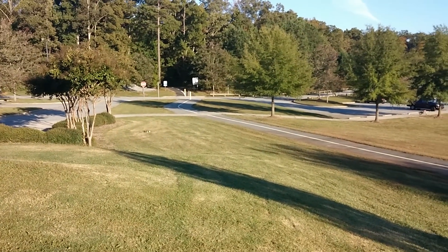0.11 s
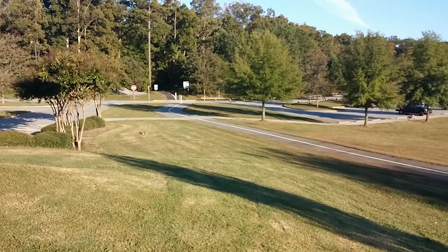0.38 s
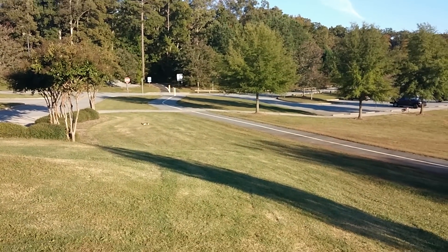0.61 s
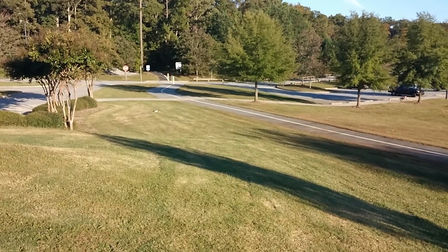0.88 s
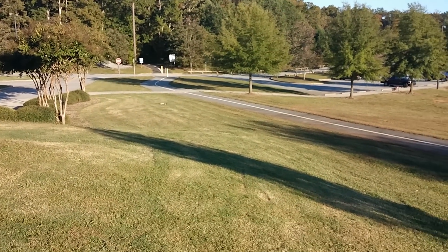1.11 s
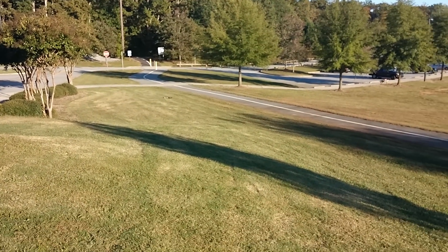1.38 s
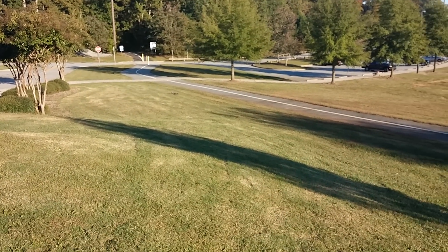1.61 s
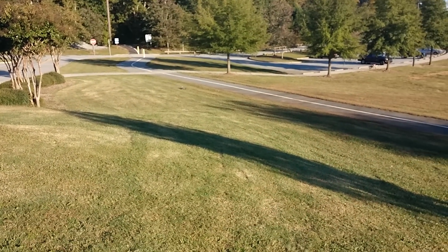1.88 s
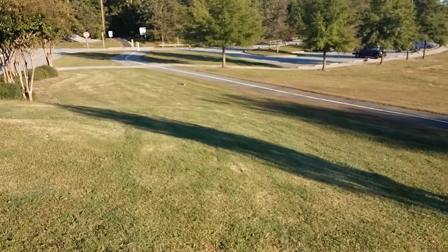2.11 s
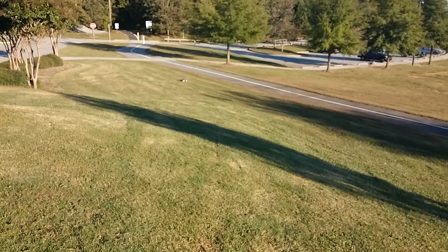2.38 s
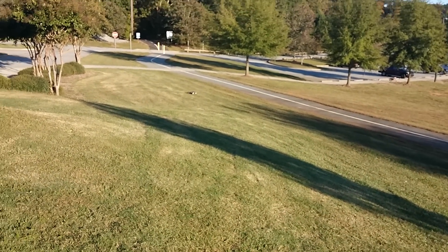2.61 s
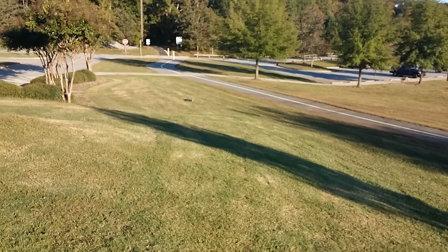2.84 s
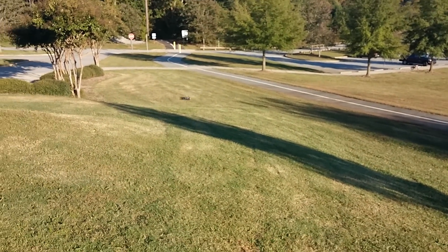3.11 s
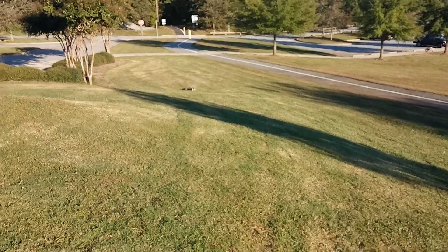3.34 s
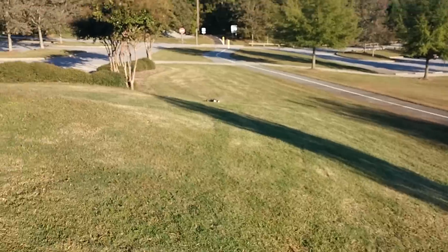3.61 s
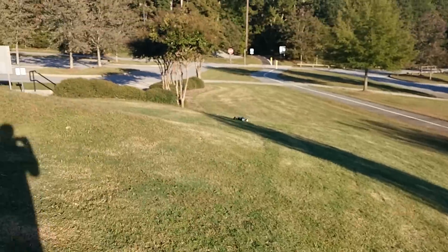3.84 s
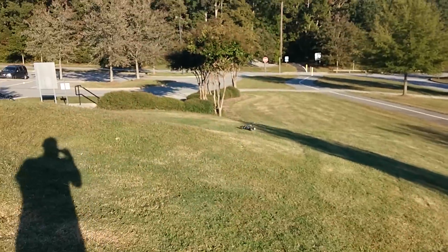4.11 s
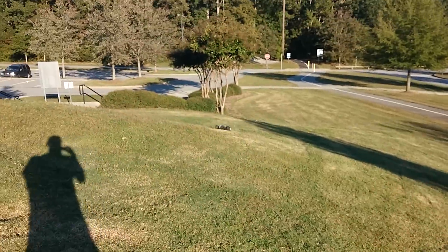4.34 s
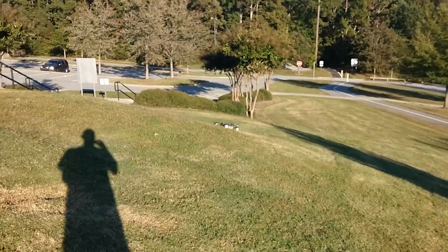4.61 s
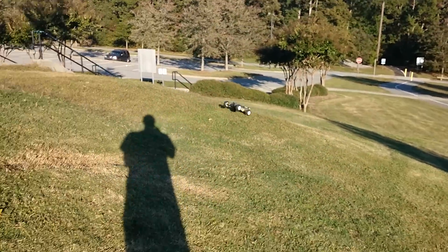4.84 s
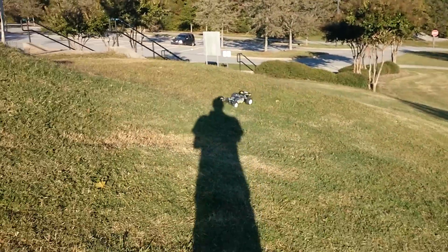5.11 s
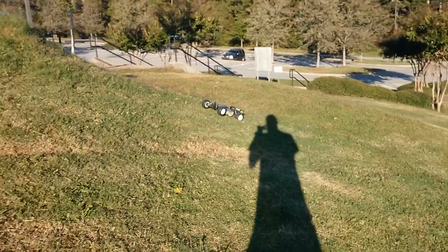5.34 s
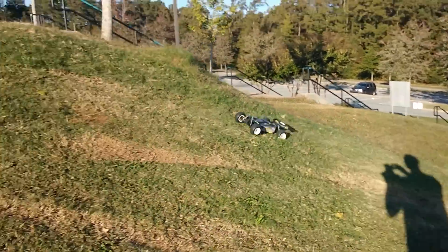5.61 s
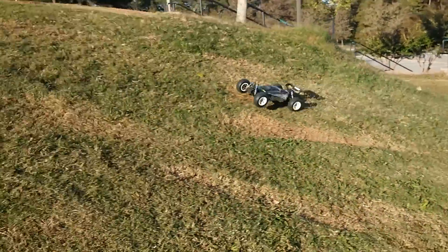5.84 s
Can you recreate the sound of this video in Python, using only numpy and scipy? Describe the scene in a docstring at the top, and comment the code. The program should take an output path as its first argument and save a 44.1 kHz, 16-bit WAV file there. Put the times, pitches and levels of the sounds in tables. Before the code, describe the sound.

A distant toy truck's thin gear whine grows into a harsh, buzzing rattle nearby, with handling thumps and sharp remote-trigger clicks over low traffic rumble.

```python
"""Electric model truck on park grass

The truck races over the grass and comes near: noise through gearbox resonances rattles, rough tones whine
and the speed controller sings high. Far traffic rumbles and washes as shaped noise. At the phone, fingers tap
beside its left microphone as short knocks; the remote's trigger clicks as noise bursts and its spring rings.
Now and then the level of park and truck dips briefly, while taps and clicks stay as they are."""
import sys
import numpy as np
from scipy import signal
from scipy.fft import rfft, irfft, next_fast_len
from scipy.io import wavfile
from scipy.ndimage import uniform_filter1d, map_coordinates

SR = 44100
rng = np.random.default_rng(int(sys.argv[2]) if len(sys.argv) > 2 else 0)


def bounce(signal):
    """Save signal as a 16-bit WAV file at the path given by the first command-line argument."""
    frames = np.transpose(np.atleast_2d(signal))
    limited = np.clip(frames, -1, 1)
    pcm = np.round(limited * 32767).astype(np.int16)
    wavfile.write(sys.argv[1], SR, pcm)


def invert_db(level):
    """Linear amplitude ratio for a level in decibels (20 dB per decade), elementwise."""
    return 10 ** (np.asarray(level, dtype=float) / 20)


N = 263277

# Brief dips of park and truck: t/s, depth/dB, half length/s
DIP_TIMES = [(0, 20, 0.044), (0.086, 21, 0.031), (0.368, 17, 0.081), (0.576, 10.5, 0.058),
             (1.251, 13.5, 0.031), (1.354, 11, 0.094), (1.707, 17.5, 0.014), (1.752, 4, 0.074),
             (2.053, 5, 0.065), (3.403, 6.5, 0.055), (3.633, 7, 0.062), (5.208, 7, 0.066)]
# Park ambience: t/s, rumble level/dB before heaves, relative level/dB of the traffic and grass wash
PARK_LEVELS = [(0, -52, -52), (.5, -40, -36.5), (1.1, -41.5, -45), (1.5, -48.5, -43.5), (1.9, -43.5, -47),
               (2.4, -43, -36.5), (2.75, -48, -49.5), (3.2, -43.5, -43), (3.8, -47, -41.5),
               (4.2, -45.5, -43.5), (4.85, -46.5, -42.5), (5.15, -42, -35.5), (5.55, -49.5, -47.5),
               (5.8, -40.5, -29), (5.97, -38, -54)]
# Heaves of the rumble: t/s, rise/dB
RUMBLE_HEAVES = [(.14, 10.5), (.29, 10.5), (.6, 10.5), (1.63, 7.5), (1.84, 13.5), (2.2, 7), (2.67, 6.5),
                 (2.87, 7), (3.28, 4.5), (3.52, 5.5), (3.75, 9.5), (4.1, 11), (4.42, 10), (5.08, 4.5),
                 (5.38, 12.5), (5.68, 4)]
# Colour of the rumble: f/Hz, relative level/dB per Hz
RUMBLE_COLOUR = [(18, -47), (30, -65), (52, -4.5), (102, 1), (145, -11.5), (185, -11.5), (220, -46),
                 (290, -65), (480, -120)]
# Colour of the wash: f/Hz, relative level/dB per Hz
WASH_COLOUR = [(88, -20), (150, -6), (220, -6.5), (281, -10), (301, -14.5), (937, -16), (1640, -37),
               (2200, -33), (2860, -95), (4840, -120)]
# Far sound at the two microphones: (f/Hz, left over right level/dB), (f/Hz, likeness, held within -1 to 1)
FAR_PORTS = ([(60, 3), (150, 2), (380, 5.5), (950, 4.5), (2380, -5.5), (5980, 33), (15000, -13)],
              [(60, 0.95), (150, 0.95), (380, 0.52), (950, -0.6), (2380, -1.7), (5980, 0.46), (15000, -1.1)])
# Near sound at the two microphones: (f/Hz, left over right level/dB), (f/Hz, likeness)
NEAR_PORTS = ([(60, 2.5), (130, 2.6), (290, 4), (640, 5.4), (1410, 8.7), (3100, 15.6), (6820, 8.4),
               (15000, 0.44)], [(60, 0.9), (500, 0.96), (1300, 0.52), (3000, 1), (5000, 0.06),
               (12000, 0.86)])
# The phone's body delays the left port: f/Hz, phase lag/rad
LEFT_LAG = [(1000, 0), (3500, 0), (4900, 4), (9500, 4), (12300, 4.5)]
# Truck: t/s, relative gear rattle level/dB, relative chassis level/dB
TRUCK_LEVELS = [(0, -58, -60.5), (.23, -52.5, -59.5), (.46, -54, -54.5), (.75, -47.5, -57.5),
                (1.03, -51.5, -55), (1.2, -57.5, -57), (1.65, -57.5, -57.5), (1.96, -48.5, -58),
                (2.15, -60.5, -56.5), (2.27, -57.5, -59), (2.38, -47, -58), (2.46, -42, -46.5),
                (2.62, -43, -53), (2.97, -37.5, -51.5), (3.08, -38, -52), (3.22, -37.5, -58),
                (3.5, -44, -52), (3.75, -40, -51), (4.11, -36, -57.5), (4.34, -39.5, -50.5),
                (4.46, -45, -45.5), (4.57, -34, -56.5), (4.75, -34, -38), (4.88, -28, -49),
                (5.04, -25, -41), (5.3, -29.5, -37.5), (5.46, -23, -41.5), (5.7, -20, -33),
                (5.97, -18.5, -31)]
# Place of the truck: t/s, 0 ahead to 1 on the left, 0 far to 1 near
TRUCK_PLACE = [(0, 0.49, 0.4), (2.2, 0.48, 0.036), (2.7, 0.77, 0.26), (3.8, 0.82, 0.17), (4.8, 0.97, 0.82),
               (5.97, 0.85, 1)]
# Gearbox shell resonances: f/Hz, width/Hz, relative strength/dB (halved in use)
SHELL_MODES = [(2980, 310, 8), (4465, 450, 14.5), (5710, 1140, 13), (8000, 1100, 0)]
# Colour of the rattle close by: f/Hz, relative level/dB per Hz
NEAR_RATTLE = [(1100, -51), (1800, -4.5), (2500, -11.5), (2900, -7.5), (3150, -1), (3420, 2), (3800, -2.5),
               (6150, -10.5), (7360, -16), (10900, -17), (14500, -18), (15700, -19.5)]
# Colour of the same rattle across the lawn: f/Hz, relative level/dB per Hz
FAR_RATTLE = [(1100, -49), (1800, -70), (2600, -13), (3070, -6), (3700, -9.5), (4400, -4.5), (5200, -6.5),
              (6040, -4.5), (7400, -9), (11000, -14.5), (15600, -18.5)]
# Colour of the chassis: f/Hz, relative level/dB per Hz
CHASSIS_COLOUR = [(76, -24), (130, -3.5), (150, -15.5), (238, 3.5), (368, -11.5), (520, -1), (916, -3.5),
                  (1330, -7), (1590, -7.5), (2800, -17.5), (3640, -61), (6160, -120)]
# Wheels hit bumps: t/s, relative chassis jolt level/dB
WHEEL_JOLTS = [(5.041, -41), (5.261, -39), (5.668, -26.5), (5.88, -44)]
# Motor: t/s, field turns per second, closing speed/(m/s)
MOTOR_COURSE = [(0, 70, -8), (.6, 70, -8), (1, 90, -4), (2.3, 200, 3), (4.1, 220, 3.5), (4.6, 230, 2.5),
                (5.3, 120, 0), (5.44, 100, 4), (5.55, 230, .5), (5.97, 220, -.5)]
# Speed controller: t/s, relative level/dB on top of the rattle level
CONTROLLER_LEVEL = [(0, -12), (.22, -6), (.5, -16), (2.2, -34), (2.4, -15.5), (4.1, -18), (4.7, -11.5),
                    (5.2, -22.5), (5.5, -15), (5.88, -13), (5.97, -7.5)]
# Finger taps: t/s, knock level/dB at left, knock f/Hz, cycles rung, tick level/dB against the knock
FINGER_TAPS = [(0.029, -36.5, 486, 4.7, -5), (0.1157, -10.5, 740, 0.31, -14),
               (0.1924, -22.5, 694, 0.94, -26), (0.2124, -30.5, 656, 2.4, -4), (.279, -19, 790, 0.77, -35),
               (0.399, -35, 458, 3, -31), (0.4541, -15, 736, 0.65, -13.5), (0.742, -29, 510, 0.66, -3),
               (0.804, -3, 750, 0.41, -12.5), (0.8844, 0.5, 890, 0.44, -1), (0.9234, 2, 910, 0.31, -5.5),
               (1.2045, -30.5, 376, 1.6, -16), (2.178, -21, 343, 1.9, -11.5), (2.2197, -26, 850, 2.3, -33),
               (2.3213, -29, 378, 0.81, -6), (2.3445, -25, 301, 0.92, -6), (2.376, -23.5, 473, 2.6, -13),
               (2.425, -23, 330, .8, -14), (2.4581, -13.5, 426, 2.5, -2), (2.9595, -27, 900, 3.6, 6),
               (3.5033, -21.5, 447, 3.5, -3), (3.5263, -21, 503, 2.4, -21), (3.6584, -25, 396, 0.23, -20),
               (3.719, -12, 655, 0.73, -8.5), (4.3568, -24.5, 920, 0.97, -11), (4.4202, -18, 540, 4.4, -8),
               (5.1053, -12, 503, 4, 2), (5.2683, -8.5, 770, 0.84, -10), (5.2708, -7, 600, 2.5, -13)]
# Pinion mesh in throttle bursts: t/s, f/Hz, relative level/dB, relative octave level/dB
PINION_MESH = [
    [(.39, 1650, -76, -70), (.47, 1990, -61, -51)],
    [(.64, 1690, -57, -56), (.675, 1830, -53, -58), (.7, 2080, -52, -52), (.72, 2450, -56, -70),
     (.76, 2580, -47, -62), (.83, 2640, -52, -51), (.88, 2550, -58, -68)],
    [(1.04, 2480, -62, -72), (1.08, 2660, -58, -74), (1.14, 2680, -61, -68)],
    [(1.36, 1860, -66, -68), (1.475, 1860, -66, -66)],
    [(1.62, 2240, -60, -70), (1.65, 2200, -52, -67), (1.69, 2260, -68, -68)],
    [(1.712, 2555, -63, -57), (1.87, 2480, -58, -69), (1.91, 2660, -53, -51), (1.93, 2950, -57, -66),
     (1.97, 3070, -50, -50), (2.04, 3200, -63, -60)],
    [(2.24, 1950, -52, -72), (2.315, 2030, -51, -70), (2.345, 2605, -46, -64), (2.37, 3170, -53, -62),
     (2.395, 3600, -58, -62), (2.43, 4130, -48, -57), (2.5, 4350, -44, -61)],
    [(2.57, 4560, -44, -60), (2.61, 4070, -48, -58), (2.66, 4410, -46, -64), (2.69, 4420, -58, -60)],
    [(2.81, 4480, -56, -60), (2.86, 4110, -44, -67), (2.895, 4080, -48, -70)],
    [(3.13, 2850, -55, -58), (3.21, 3186, -42, -47), (3.32, 3035, -56, -55)],
    [(3.92, 4290, -46, -74), (4.02, 4325, -37, -73), (4.12, 4410, -41, -71), (4.3, 4240, -50, -70)],
    [(5.31, 2845, -42, -40), (5.395, 3060, -28, -32), (5.425, 3520, -23, -52)],
    [(5.485, 3447, -25.5, -50), (5.62, 3133, -32, -55), (5.67, 3460, -27.5, -55), (5.97, 3453, -28.5, -52)],
]
# Axle gear mesh: t/s, f/Hz, relative level/dB
AXLE_MESH = [
    [(2.52, 1351, -55), (2.66, 1266, -51), (2.78, 1313, -49), (2.88, 1123, -55)],
    [(4.7, 619, -49), (4.77, 1060, -41), (4.85, 1370, -40.5), (4.9, 1470, -41)],
    [(5.42, 1154, -40), (5.5, 1406, -34)],
    [(5.66, 1360, -29.5), (5.85, 1260, -26.5), (5.96, 1344, -28)],
]
# Other gears that sing out for a moment: t/s, f/Hz, relative level/dB
OTHER_GEARS = [
    [(.97, 3730, -63), (1.045, 4450, -63)],
    [(1.465, 4720, -64), (1.52, 4920, -68)],
    [(1.56, 6080, -68), (1.69, 5900, -60)],
    [(1.715, 3700, -68), (1.78, 3720, -65)],
    [(1.79, 6080, -62), (1.93, 5950, -59)],
    [(2.6, 4000, -54), (2.66, 3700, -53)],
    [(2.83, 3450, -41), (2.91, 3420, -56)],
    [(4.09, 3415, -40.5), (4.24, 3374, -44.5)],
    [(4.245, 3040, -49), (4.35, 2976, -45)],
    [(4.76, 3744, -42), (4.84, 3720, -40)],
    [(5.005, 3100, -29), (5.09, 3040, -30)],
    [(5.47, 2900, -32), (5.53, 2980, -25)],
    [(5.535, 1820, -34), (5.62, 1916, -33)],
    [(5.84, 4300, -30), (5.91, 4230, -25)],
]
# Trigger clicks: t/s, relative level/dB
TRIGGER_CLICKS = [(2.172, -44), (2.453, -16.5), (2.957, -16), (3.499, -23), (3.71, -15.5), (4.349, -28),
                  (5.045, -8.5), (5.103, -19), (5.269, -4.5)]
# Trigger spring twangs: t/s, relative level/dB
SPRING_TWANGS = [(2.175, -47.5), (2.376, -44), (2.959, -35.5), (3.714, -36.5), (4.352, -39)]
# Spring modes: f/Hz, relative level/dB, time/s to fall by 60 dB
SPRING_MODES = [(924, -2, 0.066), (987, 4.5, 0.15), (2007, -7, 0.28)]


def unit(x):
    """Scales to rms 1."""
    return x / np.sqrt(np.mean(x ** 2) + 1e-20)


def along(points, hz):
    """Reads (f/Hz, value) points on a log frequency axis."""
    f, v = np.transpose(points)
    return np.interp(np.log(hz + 1), np.log(f + 1), v)


def curves(rows):
    """Gives one value per sample for each column after the time."""
    s, *cols = np.transpose(rows)
    return [np.interp(np.arange(N) / SR, s, c) for c in cols]


def wobble(rate):
    """A smooth random curve, rate knots a second."""
    knots = rng.standard_normal(int(N * rate / SR) + 4)
    return map_coordinates(knots, [np.arange(N) * rate / SR])


def peaks(rows, before_s, after_s):
    """Sum of heights that rise and fall in straight lines around their times."""
    t = np.arange(N) / SR
    rises, falls = np.resize(before_s, len(rows)), np.resize(after_s, len(rows))
    total = np.zeros(N)
    for (s, height), rise, fall in zip(rows, rises, falls):
        total += height * np.clip(np.minimum(1 + (t - s) / rise, 1 - (t - s) / fall), 0, 1)
    return total


def filtered(x, response):
    """x with its spectrum multiplied by a complex response of frequency."""
    m = next_fast_len(N + SR // 4)
    return irfft(rfft(x, m) * response(np.fft.rfftfreq(m, 1 / SR)), m)[..., :N]


def patchy(depth_db):
    """Two noises with shared patches of random gain in time and frequency."""
    z = signal.stft(rng.standard_normal((2, N)), nperseg=512)[2]
    field = uniform_filter1d(rng.standard_normal(z.shape[1:]), size=4, axis=0)
    field = uniform_filter1d(field, size=8, axis=1)
    return signal.istft(z * invert_db(depth_db * unit(field)), nperseg=512)[1][:, :N]


def ports(pair, colour, space, lag=((1, 0),)):
    """Two unrelated sounds mixed to the likeness and balance of the two microphones; their mean has rms 1."""
    balance, likeness = space

    def shares(hz):
        turn = np.arccos(np.clip(along(likeness, hz), -1, 1)) / 2
        return colour(hz) * [np.cos(turn), np.sin(turn)]

    def sides(hz):
        tilt = np.tanh(along(balance, hz) * np.log(10) / 40)
        return [(1 + tilt) * np.exp(-1j * along(lag, hz)), 1 - tilt]

    common, opposed = filtered(pair, shares)
    both = filtered([common + opposed, common - opposed], sides)
    return both / np.sqrt(np.mean(both.mean(axis=0) ** 2))


def tone(hz, width, lurch):
    """A rough tone of rms 1: noise of a width in Hz around a pitch that lurches by some Hz as wheels bounce."""
    shake = wobble(width) + 1j * wobble(width)
    turns = np.cumsum(hz + lurch * wobble(110)) / SR
    return unit(invert_db(2 * wobble(60)) * np.real(shake * np.exp(2j * np.pi * turns)))


def dips():
    """Gain of the brief drops in level: each depth in dB is reached and left in straight lines."""
    s, depth_db, half_s = np.transpose(DIP_TIMES)
    return invert_db(-peaks(list(zip(s, depth_db)), half_s, half_s))


def park():
    """Low rumble that comes in lumps, and the wash of far traffic and leaves."""
    rumble_db, wash_db = curves(PARK_LEVELS)
    heave_db = peaks(RUMBLE_HEAVES, 0.072, 0.072)  # half lengths in s
    rumble = ports(rng.standard_normal((2, N)), lambda hz: invert_db(along(RUMBLE_COLOUR, hz)), FAR_PORTS)
    wash = ports(patchy(0.38), lambda hz: invert_db(along(WASH_COLOUR, hz)), FAR_PORTS)
    wash_db = wash_db - 5.5 + 0.33 * heave_db + 3.2 * wobble(15)  # takes a third of each heave
    return invert_db(rumble_db + heave_db) * rumble + invert_db(wash_db) * wash


def shell(f):
    """Gearbox shell: its resonances add to the direct sound of the teeth."""
    ring = sum(invert_db(db / 2) * 1j * f * w / (c * c - f * f + 1j * f * w) for c, w, db in SHELL_MODES)
    return 1 + 1.45 * abs(ring)


def gear_rattle():
    """Loose teeth knock unevenly into the gearbox shell; colour and place shift with the distance."""
    rattle_db, _ = curves(TRUCK_LEVELS)
    left, near = np.clip(curves(TRUCK_PLACE), 0, 1)
    load = invert_db(0.86 * wobble(80) + 1.13 * wobble(400))  # uneven load on the teeth
    knocks = load * patchy(2.0)
    close_by = unit(filtered(knocks, lambda f: invert_db(along(NEAR_RATTLE, f))))
    across_lawn = unit(filtered(knocks, lambda f: invert_db(along(FAR_RATTLE, f))))
    teeth = near * close_by + (1 - near) * across_lawn
    on_left = left * ports(teeth, shell, NEAR_PORTS, LEFT_LAG)
    ahead = (1 - left) * ports(teeth, shell, FAR_PORTS)
    return invert_db(rattle_db - 0.57) * (on_left + ahead)


def chassis():
    """Bumps shake the chassis, a low uneven noise; single jolts swell and fall on top."""
    _, chassis_db = curves(TRUCK_LEVELS)
    bumps = invert_db(2.5 * wobble(30)) * patchy(2.08)
    jolts = peaks([(s, invert_db(db)) for s, db in WHEEL_JOLTS], 0.025, 0.05)  # rise and fall in s
    shaken = ports(bumps, lambda hz: invert_db(along(CHASSIS_COLOUR, hz)), NEAR_PORTS, LEFT_LAG)
    return invert_db(3.0) * (invert_db(chassis_db) + jolts) * shaken


def controller():
    """The switching tone splits by the motor's field rate and shifts with the closing speed (Doppler)."""
    switch_hz, sound_speed = 11890, 343  # Hz, m/s
    field_hz, closing = curves(MOTOR_COURSE)
    rattle_db, _ = curves(TRUCK_LEVELS)
    controller_db, = curves(CONTROLLER_LEVEL)
    heard_hz = switch_hz * (1 + closing / sound_speed)
    song = []
    for port in "LR":
        lower, upper = tone(heard_hz - field_hz, 230, 45), tone(heard_hz + field_hz, 230, 45)
        song.append(lower + 0.7 * upper)
    return invert_db(rattle_db + controller_db) * np.array(song)


def fingers():
    """A tap knocks the phone's case, ticks, and the case swings back with a thud; little reaches the right port."""
    out, lead = np.zeros(N + SR), SR // 200
    t = (np.arange(SR // 20) - lead) / SR
    noise = rng.standard_normal((2, len(FINGER_TAPS), len(t)))
    grit, lumps = [unit(uniform_filter1d(uniform_filter1d(x, size=n), size=n))
                   for x, n in zip(noise, (12, 90))]
    for k, (s, db, hz, cycles, tick_db) in enumerate(FINGER_TAPS):
        fade = np.exp(-(t * hz / np.where(t < 0, 0.5, cycles)) ** 2)
        knock = -np.cos(2 * np.pi * hz * t * (1 - 9.8 * t)) * fade  # the pitch sinks while it rings
        tick = -invert_db(tick_db) * np.cos(2 * np.pi * 2400 * t) * np.exp(-(t / 0.0003) ** 2)
        # The thud grows 0.51 dB per dB of tap and is weaker after a long knock
        thud_gain = invert_db(-15.5 + (0.51 - 1) * db) * np.clip(2.1 / cycles, 0, 1)
        late = t - 0.003
        thud = -thud_gain * np.cos(2 * np.pi * 240 * late) * np.exp(-(late / 0.0028) ** 2)
        # A longer knock rattles the case more
        scuff = cycles * invert_db(-24.5 - 60 * t / 0.1 + 5.3 * lumps[k]) * (t > 0) * grit[k]
        out[round(s * SR) - lead:][:len(t)] += invert_db(db) * (knock + tick + thud + scuff)
    return out[:N] * invert_db([[0], [-28]])


def bursts(tables, width):
    """Gear-mesh tones, one multiple of the pitch for each level column, faded in and out."""
    t = np.arange(N) / SR
    hz, *levels_db = curves(np.vstack(tables))
    fade = sum(np.clip(np.minimum(t - rows[0][0], rows[-1][0] - t) / 0.01, 0, 1) for rows in tables)
    return sum(fade * invert_db(db) * tone((k + 1) * hz, (1 + k / 2) * width, width / 6)
               for k, db in enumerate(levels_db))


def body(x):
    """The body shell's many close modes radiate some pitches better and break a gliding tone into steps."""
    depth_db, spacing_hz = 3.5, 110
    knots = rng.standard_normal(SR // spacing_hz)
    return filtered(x, lambda f: invert_db(depth_db * (map_coordinates(knots, [f / spacing_hz]) - 0.5)))


def gear_whine():
    """Meshing teeth of pinion, axle and other gears sing through the body shell, stronger on the left."""
    left, _ = np.clip(curves(TRUCK_PLACE), 0, 1)
    side = invert_db(np.outer([3, -6], left)) + [[0.7], [-0.7]]
    return side * body(bursts(PINION_MESH, 290) + bursts(AXLE_MESH, 290) + bursts(OTHER_GEARS, 290))


def trigger():
    """Plastic clicks carried through the air; some leave the return spring ringing."""
    clicks, ring, t = np.zeros(N + SR), np.zeros(N + SR), np.arange(SR // 4) / SR
    for s, db in TRIGGER_CLICKS:
        clicks[round(s * SR):][:len(t)] += invert_db(db - 60 * t / 0.023) * rng.standard_normal(len(t))
    clicks = filtered(clicks, lambda f: 1j * f * 2200 / (2400 ** 2 - f * f + 1j * f * 2200)
                      + 0.4j * f * 2500 / (5000 ** 2 - f * f + 1j * f * 2500))
    clicks = filtered(clicks, lambda f: 1 / (1 + 1j * f / 6500) ** 4)  # dull plastic
    for s, db in SPRING_TWANGS:
        for hz, level_db, t60 in SPRING_MODES:
            ring[round(s * SR):][:len(t)] += invert_db(db + level_db - 60 * t / t60) * np.sin(2 * np.pi * hz * t)
    return clicks * invert_db([[3], [-3]]) + ring[:N] * invert_db([[5], [-14]])


def scene():
    """Park, truck and the hands that hold phone and remote."""
    truck = gear_rattle() + chassis() + controller() + gear_whine()
    return dips() * (park() + truck) + fingers() + trigger()


def low_pass(x):
    """Removes everything above the highest recorded frequency."""
    return signal.sosfilt(signal.butter(12, 15730, fs=SR, output="sos"), x)


def record(dry):
    """The phone rounds off the loudest peaks at full scale."""
    rounded = dry / (1 + abs(dry) ** 4) ** (1 / 4)
    return low_pass(rounded)


dry = scene()
out = record(dry)
bounce(out)
```